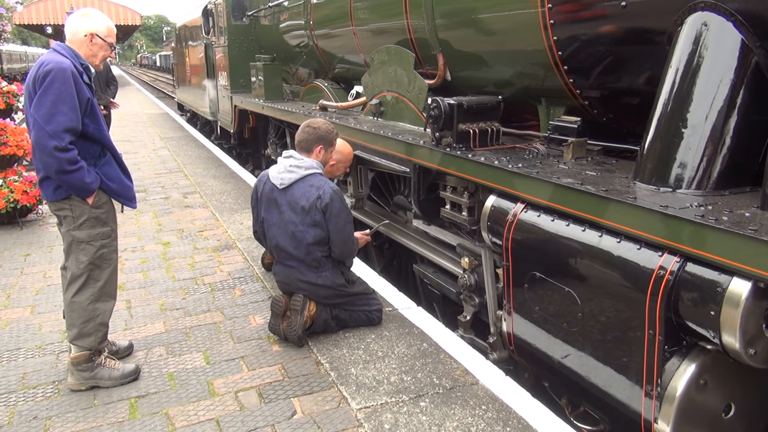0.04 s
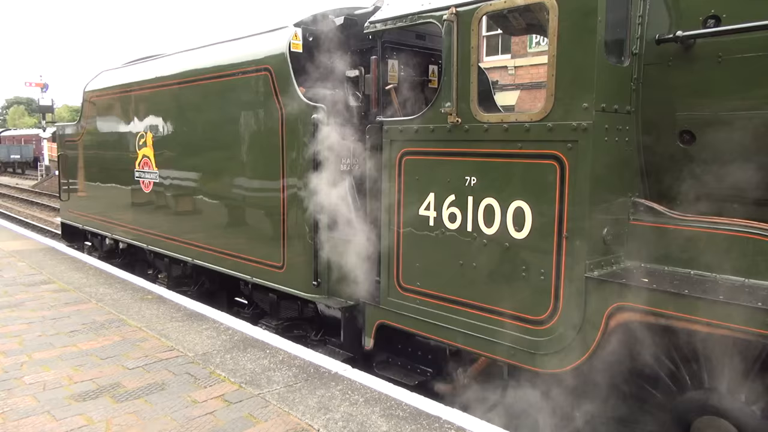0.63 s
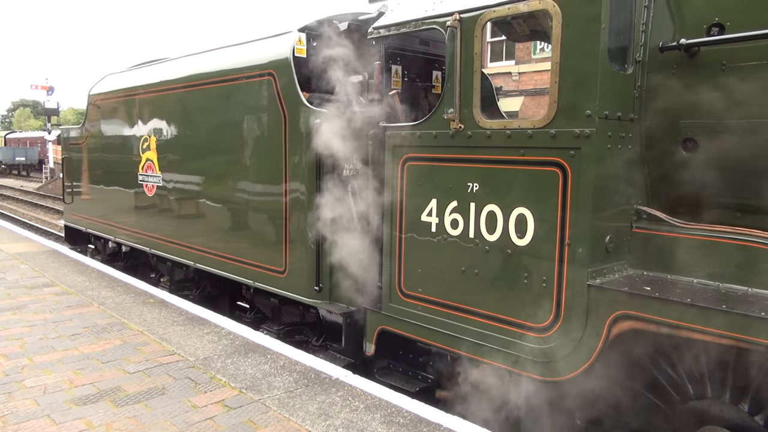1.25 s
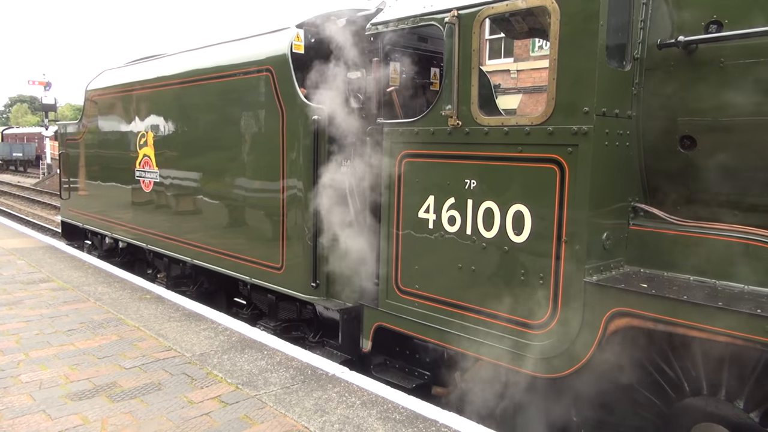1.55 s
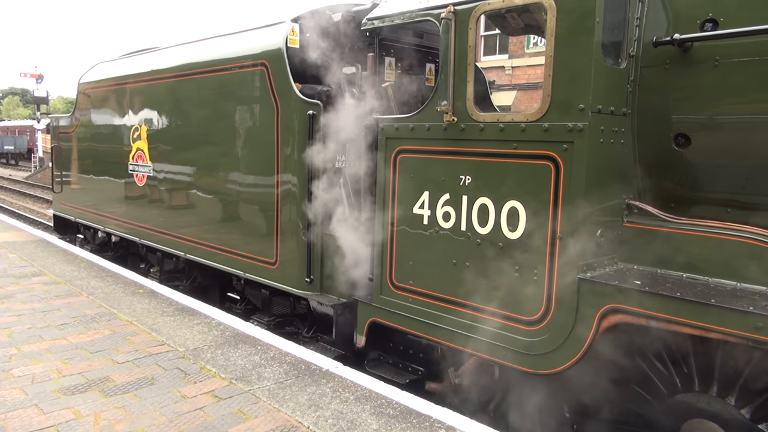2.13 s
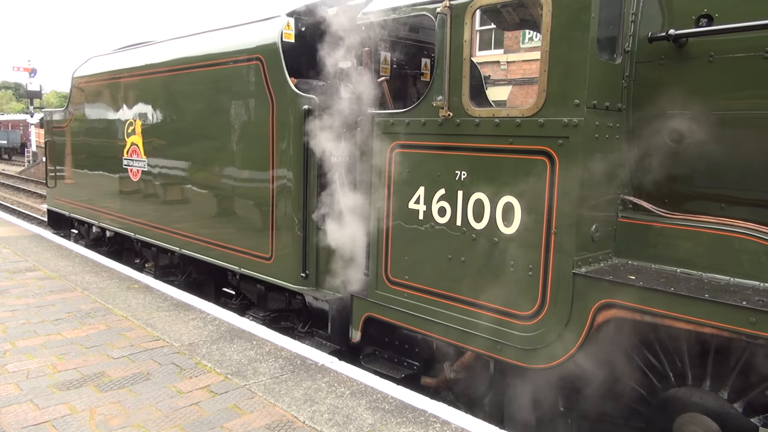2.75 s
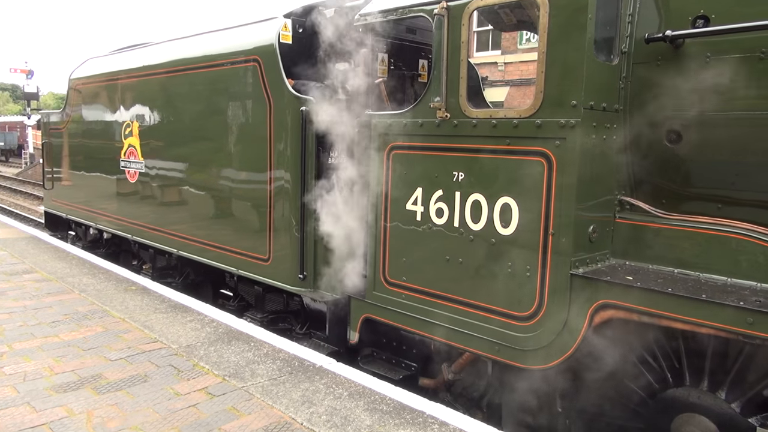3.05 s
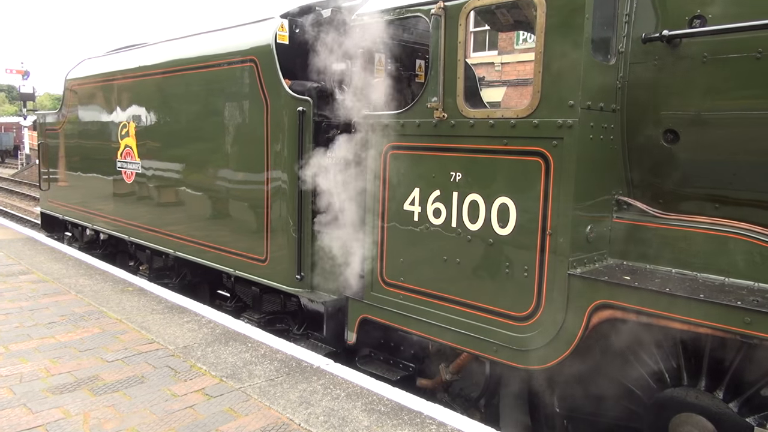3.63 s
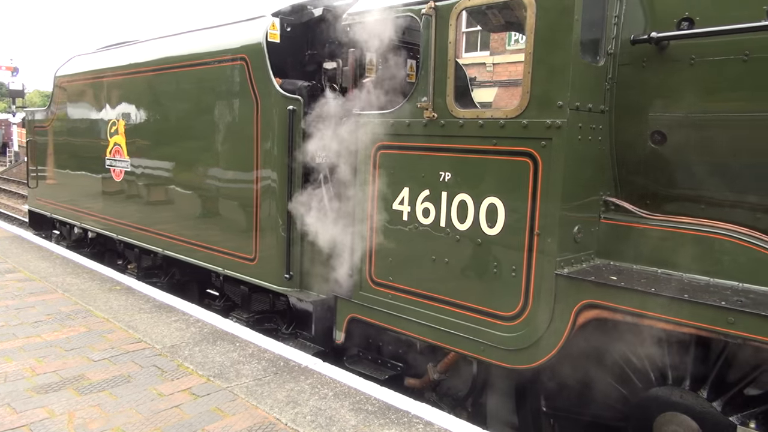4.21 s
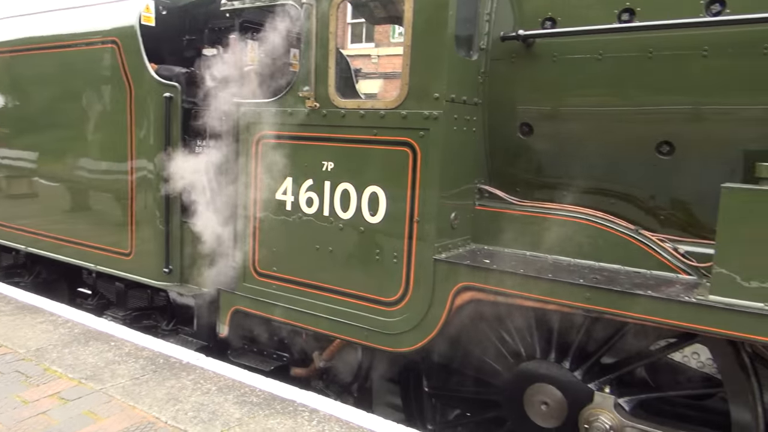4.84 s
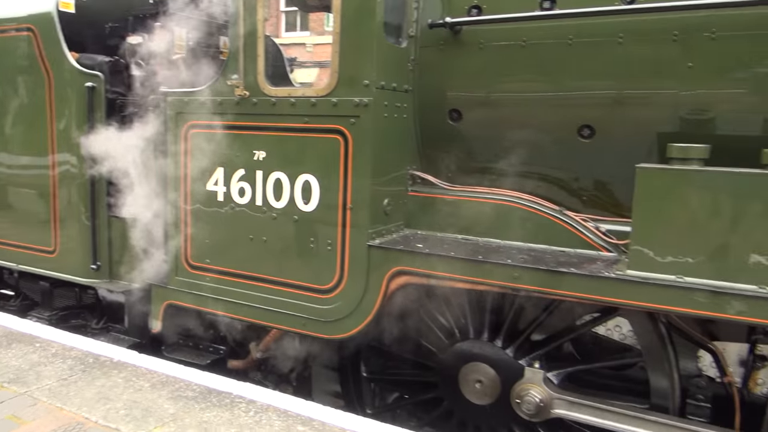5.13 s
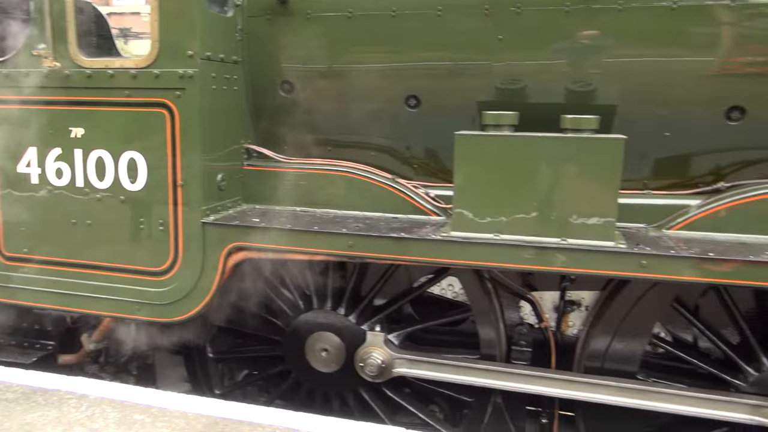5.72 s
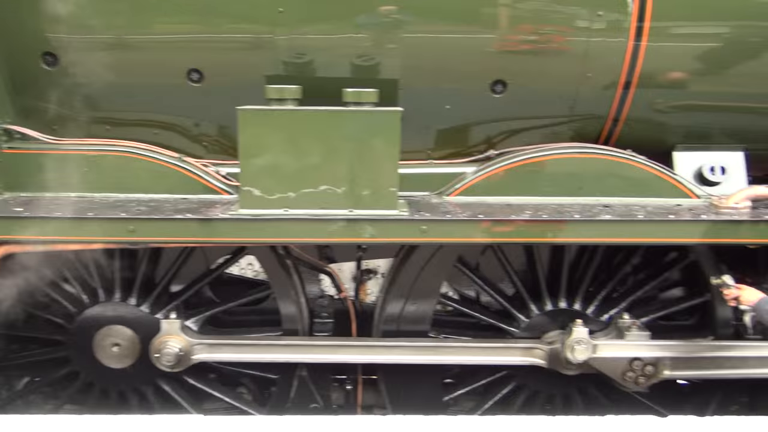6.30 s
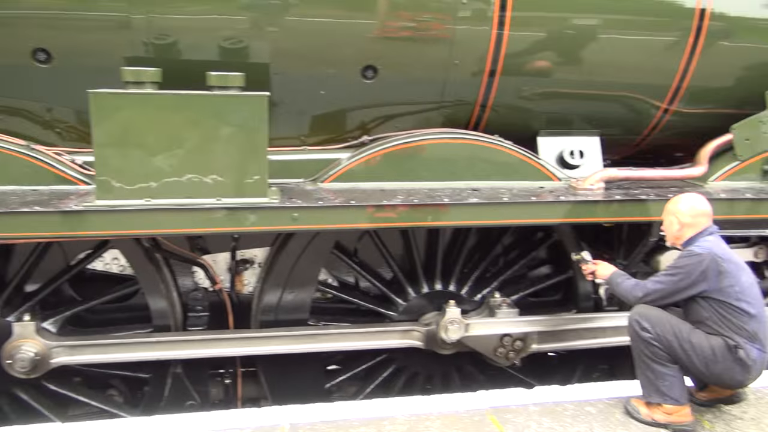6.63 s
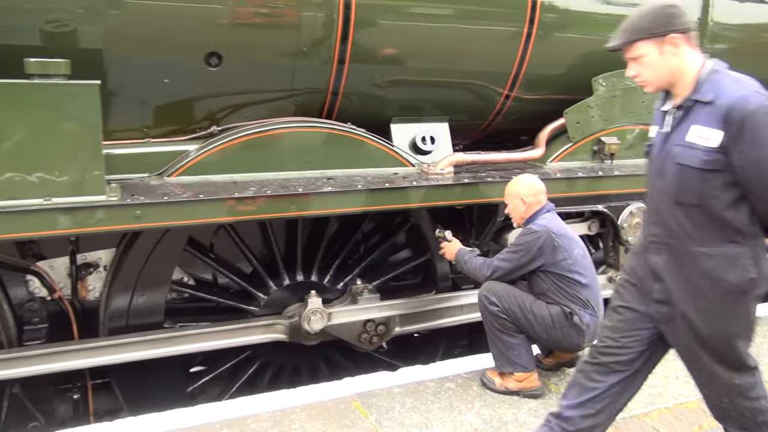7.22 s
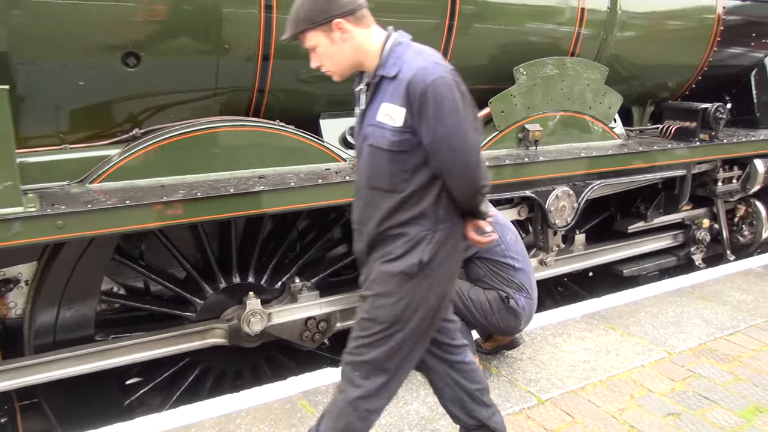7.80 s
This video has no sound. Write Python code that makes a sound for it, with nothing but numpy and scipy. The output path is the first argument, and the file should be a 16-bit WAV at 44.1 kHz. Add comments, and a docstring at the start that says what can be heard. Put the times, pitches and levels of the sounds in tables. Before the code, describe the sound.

Close to a steam engine at rest in a station, a narrow jet hisses and sings a thin, high, wavering whistle. It starts softly, cuts out for an instant and returns stronger. A few light, dull knocks pass nearby, the loudest near the middle with a short scrape. A hollow rush of steam builds underneath and moves leftward, and a faint puff of wind touches the microphone near the end.

```python
"""Steam leaking from a standing locomotive

A narrow jet hisses and sings a shrill, unsteady whistle; a duller rush swells from under the boiler,
and the steel sides throw it all back. We listen by the cylinders, jump to the cab after a brief break,
then turn towards the boiler. A few light knocks, one scuff and a puff of wind pass close by."""
import sys
import numpy as np
from scipy import signal
from scipy.fft import rfft, irfft, next_fast_len
from scipy.io import wavfile
from scipy.ndimage import uniform_filter1d

SR = 44100
rng = np.random.default_rng(int(sys.argv[2]) if len(sys.argv) > 2 else 0)


def dump(signal):
    """Clip the signal to [-1, 1] and save it as 16-bit WAV at the path in sys.argv[1]."""
    limited = np.clip(np.atleast_2d(signal).T, -1, 1)
    pcm = np.round(limited * 32767).astype(np.int16)
    wavfile.write(sys.argv[1], SR, pcm)


N = 346626
T = np.arange(N) / SR

# Jet and rush cross from right to left during the turn (positive pan is left):
# cylinders_pan_db, cab_pan_db, turned_pan_db, start_s, end_s
JET_PAN = (2, -2.4, 3.5, 3.8, 7)
RUSH_PAN = (0, -4.5, 6.5, 4, 8)


def whistle(gain_db=0.9, tune_hz=8, jitter_hz=78, slap_s=0.01156, echo_db=-4):
    """The jet's edge tone, shaken by its own turbulence, with a breathy band below and a weak octave."""
    # The tone by the cab, before gain and tuning: time_s, level_db, pitch_hz
    tone_curve = [(0.76, -20, 5837), (1.13, -18, 5877), (1.94, -16, 5896), (2.62, -18, 5906),
                  (2.76, -15.5, 5925), (2.84, -18, 5890), (5.8, -17.5, 5890), (5.96, -20.5, 5890),
                  (6.02, -16, 5850), (6.18, -22, 5894), (7.7, -16, 5884), (7.86, -18, 5915)]
    # The breathy band by the cab: time_s, level_db
    breath_curve = [(.73, -30), (3.8, -27.5), (5.1, -29.5), (6.25, -34.5), (7.2, -24), (7.86, -29.5)]
    cab_db, cab_hz = follow(tone_curve)
    firming = ease(6.0, 6.3)  # late on, the pitch steadies and the octave steps up
    waver_hz = by_place(75, 35 * (1 - 0.47 * firming))
    falter = np.exp(0.635 * wander(22.09))  # the pitch dips further than it rises
    pitch = by_place(5910, cab_hz) + tune_hz - waver_hz * unit(falter - falter.mean())
    cycles = np.cumsum(pitch + jitter_hz * wander(217)) / SR
    tone = np.sqrt(2) * np.sin(2 * np.pi * cycles) + amp(-5) * resonant_noise(pitch - 100, 660, order=5)
    tone *= amp(0.9 * wander(80))
    # The engine's side returns the pitch of a moment ago, which beats against the pitch now.
    tone += 0.53 * np.interp(T - slap_s, T, tone, left=0)
    tone += amp(echo_db) * echoes(tone, t60_s=0.24)
    tone /= np.sqrt(uniform_filter1d(tone ** 2, size=4500))  # even out the slow swings in level
    breath = resonant_noise(5450, 1120, order=5)
    breath = unit(breath + amp(echo_db) * echoes(breath, t60_s=0.092))
    octave = unit(resonant_noise(2 * pitch - 60, 900, order=5) + 0.71 * np.sin(4 * np.pi * cycles))
    jet = amp(by_place(-33, cab_db + gain_db)) * tone
    jet += amp(by_place(-41.5, follow(breath_curve)[0])) * breath
    jet += amp(by_place(-46, -35.5 + 4.5 * firming)) * octave
    return place(jet, bearing(*JET_PAN), spread_db=by_place(-9, -17))


def hiss(gain_db=3.0, flicker_db=0.5, swell_db=0.77):
    """Broad noise of the jet, flickering as drops of water pass the gap."""
    # The hiss by the cab, before gain: time_s, level_db
    hiss_curve = [(0.76, -26.5), (1.86, -29.5), (5.45, -27), (6.41, -30.5), (7.7, -32.5), (7.86, -32)]
    # Spectrum of the jet: frequency_hz, level_db
    hiss_colour = [(2500, -24), (3750, -6), (4150, -1.5), (5000, 0.5), (6600, -4.5), (7500, 1), (8300, -5),
                   (9100, 0.5), (9900, -2), (10450, -5.5), (11100, 0), (12500, -8.5), (13400, -17),
                   (14200, -8.5), (16000, -15.5)]
    level_db = by_place(-41.3, follow(hiss_curve)[0]) + gain_db
    jet = noise(hiss_colour) * amp(flicker_db * wander(47) + swell_db * wander(6.7))
    return place(amp(level_db) * reflected(jet), 0.7 * bearing(*JET_PAN), spread_db=-44)


def rush(billow_db=0.66):
    """Slower, wider steam billows out under the boiler, brightening as the microphone turns to it."""
    # Swells of the middle, the hollow body and the bright top, one row each:
    # cylinders_db, cab_db, swell_db, start_s, peak_s, fade_db_per_s
    swells = [(-37.5, -36.5, 7.5, 3.3, 5.6, 1.6), (-43, -41.5, 8, 3.28, 4.43, 0.14),
              (-37.6, -35.5, 8.5, 2.43, 6.55, 2.5)]
    # Spectra of those three layers: frequency_hz, level_db
    mid_colour = [(250, -15), (600, -9), (900, -2), (1100, -2), (1500, 1), (1800, -2), (2100, -5.5),
                  (2700, -12), (4000, -36)]
    body_colour = [(120, -21), (290, -16.5), (370, -1.5), (425, -2.5), (490, 2.5), (550, 0.5), (625, -2.5),
                   (700, -4.5), (800, -11.5), (1200, -26.5)]
    bright_colour = [(1500, -18.5), (2100, -5.5), (2450, -1.5), (2700, -4), (3050, -1), (3450, -5),
                     (3750, -10), (4500, -12.5), (6500, -17)]
    gains = []
    for cylinders_db, cab_db, swell_db, start_s, peak_s, fade in swells:
        ride_db = swell_db * ease(start_s, peak_s) - fade * np.maximum(T - peak_s, 0)
        gains.append(amp(by_place(cylinders_db, cab_db + ride_db)))
    mid_gain, body_gain, bright_gain = gains
    focus_hz = by_place(2201, 1902 + (3770 - 1902) * ease(4.0, 7.7))
    bright = noise(bright_colour) + amp(-4) * resonant_noise(focus_hz, 2200, order=5)
    steam = mid_gain * noise(mid_colour) + body_gain * noise(body_colour) + bright_gain * bright
    steam *= amp(billow_db * wander(15))
    return place(reflected(steam), bearing(*RUSH_PAN), spread_db=-47)


def hollows():
    """Pipes and pockets around the cab ring faintly in the steam, receding in the middle of the turn."""
    # Cavity resonances: pitch_hz, width_hz, relative_db
    cavities = [(831, 11, -14), (1032, 32, -16), (1298, 39, -3), (1466, 8.3, -11.5), (1630, 34, -15),
                (1978, 43, -8), (2500, 54, -16.5), (3272, 88, -7.5), (3430, 53, -9.5), (4470, 36, -25),
                (4710, 46, -16), (4910, 24, -10), (5240, 45, -21), (6600, 45, -3), (8500, 64, -8)]
    ring = sum(amp(db) * resonant_noise(hz, width_hz) for hz, width_hz, db in cavities)
    dip_db = 5.5 * np.exp(-(T - 5.2) ** 2)
    return place(ring * amp(by_place(-53, -35 - dip_db)), 0.35 * bearing(*RUSH_PAN), spread_db=-30)


def knocks(rise_s=0.0017, thud_gain=0.27):
    """Each blow rings one damped low mode over a short dull thud."""
    # Dull knocks close by: start_s, level_db, pitch_hz, t60_s, pan_db
    blows = [(0.667, -27, 318, 0.13, -6), (0.692, -26.5, 210, 0.12, -7), (3.607, -13, 75, 0.034, -5),
             (3.619, -5.5, 199, 0.03, -5), (3.629, -13, 180, 0.068, -5), (3.630, -18, 512, 0.15, -4),
             (3.704, -23, 110.5, 0.043, -9), (3.993, -26, 184, 0.11, -4), (4.029, -21, 178, 0.047, -7),
             (7.807, -9, 370, 0.013, 6), (7.840, -16, 457, 0.021, 2)]
    out = np.zeros((2, N))
    thud = thud_gain * noise([(40, -14), (150, -9), (550, 11), (1200, -18), (5000, -40)])
    for start_s, db, hz, t60_s, pan_db in blows:
        age = np.maximum(T - start_s, 0)
        attack = 1 - np.exp(-age / rise_s)
        decay = amp(db - 60 * np.minimum(age / t60_s, 2))
        blow = (np.sin(2 * np.pi * hz * age) + thud) * attack * decay
        out += amp([[pan_db / 2], [-pan_db / 2]]) * blow
    return out


def scuff(grit_db=2):
    """Grit catches and slips in one quick scrape, on the heels of the loudest knock."""
    # Spectrum of the grit: frequency_hz, level_db
    grit_colour = [(100, -11), (500, -6), (900, 0.5), (1400, -0.5), (2000, 2.5), (2800, -4), (3600, 0.5),
                   (4300, -21), (8000, -13), (11000, -8), (16000, -23)]
    # The scrape: start_s, length_s, level_db
    strokes = [(3.612, 0.068, -18)]
    scrape = unit(noise(grit_colour) * amp(grit_db * wander(380)))
    return place(scrape * envelope(strokes, rise_s=0.042, t60_s=0.19), pan_db=-6, spread_db=-22)


def boiler(murmur_db=-42, drone_hz=58):
    """The boiler's low murmur, with spells of deep drone."""
    # Spectrum of the murmur: frequency_hz, level_db
    murmur_colour = [(20, -31), (45, -7), (70, -6.5), (100, -10), (170, 0), (240, -1), (320, -2.5),
                     (600, -17)]
    # Spells of drone: start_s, length_s, level_db
    spells = [(0, 3.4, -60.5), (4.82, .7, -53)]
    drone = envelope(spells, rise_s=0.2, t60_s=0.45) * resonant_noise(drone_hz, 22, order=3)
    return place(amp(murmur_db) * noise(murmur_colour) + drone, pan_db=-4.5, spread_db=-21)


def wind(buffet_db=2):
    """Lumpy puffs of wind buffet the microphone."""
    # Puffs: start_s, length_s, level_db
    puffs = [(0, .7, -50), (6.8, 0.57, -40.5)]
    # Spectrum of the buffeting: frequency_hz, level_db
    wind_colour = [(15, -30), (45, 1), (75, -2), (150, -4.5), (300, -19), (800, -45)]
    strength = envelope(puffs, rise_s=0.11, t60_s=1.9) * amp(buffet_db * wander(14))
    return place(strength * noise(wind_colour), pan_db=-2.5, spread_db=-11)


def echoes(x, t60_s, count=6):
    """Dense short reflections off steel and paving; their pattern shifts as the microphone turns."""
    t = np.arange(4096) / SR
    out = np.zeros(N)
    for k in range(count):
        taps = rng.standard_normal(len(t)) * amp(-60 * t / t60_s) * (t > 0.002)
        crossfade = np.cos(np.pi / 2 * np.clip(T / T[-1] * (count - 1) - k, -1, 1))
        out += crossfade * signal.oaconvolve(x, taps / np.linalg.norm(taps))[:N]
    return out


def reflected(x, wet=0.58):
    """Direct sound plus near reflections, which ripple the colour of a noise."""
    return (x + wet * echoes(x, t60_s=0.09, count=7)) / np.hypot(1, wet)


def place(x, pan_db, spread_db):
    """Stereo from a left-over-right level difference, plus faint reflections from the sides."""
    side = np.tanh(pan_db * np.log(10) / 40) * x + amp(spread_db) * echoes(x, t60_s=0.12, count=2)
    return np.array([x + side, x - side])


def by_place(cylinders, cab, jump_s=0.726):
    """One value by the cylinders, another from the jump to the cab onwards."""
    return cylinders + (cab - cylinders) * ease(jump_s - 0.009, jump_s + 0.009)


def bearing(cylinders_db, cab_db, turned_db, start_s, end_s):
    """Pan of a source as the microphone turns past it."""
    return by_place(cylinders_db, cab_db + (turned_db - cab_db) * ease(start_s, end_s))


def noise(colour):
    """Noise of rms 1, shaped by rows of frequency_hz, level_db."""
    corner_hz, db = np.transpose(colour)
    size = next_fast_len(N)
    hz = np.fft.rfftfreq(size, 1 / SR)
    gain = amp(np.interp(np.log(hz + 1), np.log(corner_hz), db))
    return unit(irfft(rfft(rng.standard_normal(size)) * gain, size)[:N])


def resonant_noise(hz, width_hz, order=1):
    """Turbulence ringing in a resonance, which may move; each added order narrows the band."""
    pole = np.exp(-np.pi * width_hz / SR)
    band = rng.standard_normal(N) + 1j * rng.standard_normal(N)
    for _ in range(order):
        band = signal.lfilter([1 - pole], [1, -pole], band)
    carrier = np.exp(2j * np.pi * np.cumsum(hz * np.ones(N)) / SR)
    return unit((band * carrier).real)


def wander(rate_hz):
    """Random drift of rms 1, rolled off above the rate."""
    steps = rng.standard_normal(N // 16 + 2)
    slow = signal.sosfilt(signal.butter(2, rate_hz, fs=SR / 16, output="sos"), steps)
    return unit(np.interp(np.arange(N) / 16, np.arange(len(slow)), slow))


def envelope(events, rise_s, t60_s):
    """Each event rises, holds to the end of its length and dies away."""
    out = np.zeros(N)
    for start_s, length_s, db in events:
        attack = np.clip((T - start_s) / rise_s, 0, 1)
        out += attack * amp(db - 60 * np.maximum(T - start_s - length_s, 0) / t60_s)
    return out


def follow(rows):
    """Joins timed rows by straight lines: one signal for each column after the time."""
    times, *columns = np.transpose(rows)
    return [np.interp(T, times, column) for column in columns]


def ease(start_s, end_s):
    """A smooth move from 0 to 1 between two times."""
    return np.sin(np.pi / 2 * np.clip((T - start_s) / (end_s - start_s), 0, 1)) ** 2


def amp(db):
    """Decibels to gain."""
    return 10 ** (np.asarray(db) / 20)


def unit(x):
    """Scales to rms 1."""
    return x / np.sqrt(np.mean(x ** 2) + 1e-20)


def scene():
    """All the sources at the microphone."""
    return whistle() + hiss() + hollows() + rush() + boiler() + wind() + knocks() + scuff()


def record(dry, mono_above_hz=7500, treble_width=0.024, low_cut_hz=38, high_cut_hz=15780):
    """The stereo sound, band-limited, nearly mono in the top treble and thin in the deep bass."""
    # The sound breaks off briefly at the jump to the cab: time_s, gain_db
    dropout = [(.707, 0), (.710, -32), (.718, -32), (.722, -9), (.729, -7), (.732, 0)]
    mid, side = (dry[0] + dry[1]) / 2, (dry[0] - dry[1]) / 2
    low_side = signal.oaconvolve(side, signal.firwin(41, mono_above_hz, fs=SR), "same")
    side = low_side + treble_width * (side - low_side)
    low_cut = signal.butter(2, low_cut_hz, "high", fs=SR, output="sos")
    stereo = signal.sosfilt(low_cut, [mid + side, mid - side]) * amp(follow(dropout)[0])
    high_cut = signal.firwin(801, high_cut_hz, window=("kaiser", 9), fs=SR)
    return signal.oaconvolve(stereo, high_cut[None], "same", axes=1)


dry = scene()
out = record(dry)
dump(out)
```